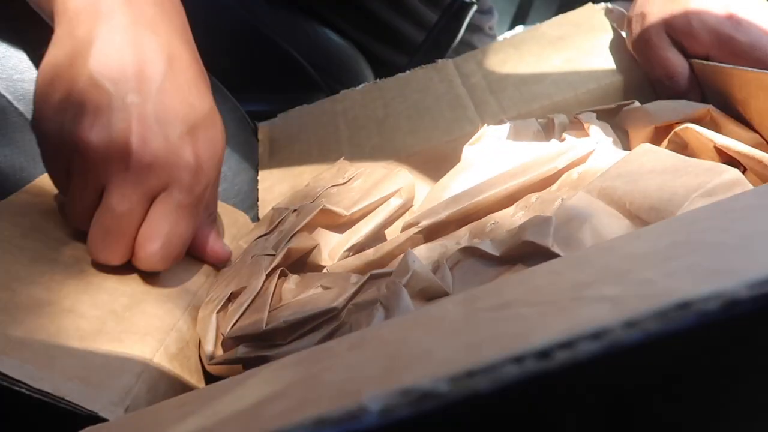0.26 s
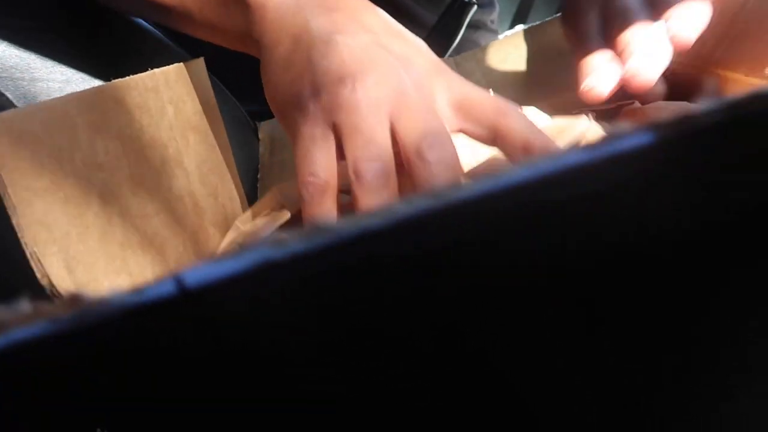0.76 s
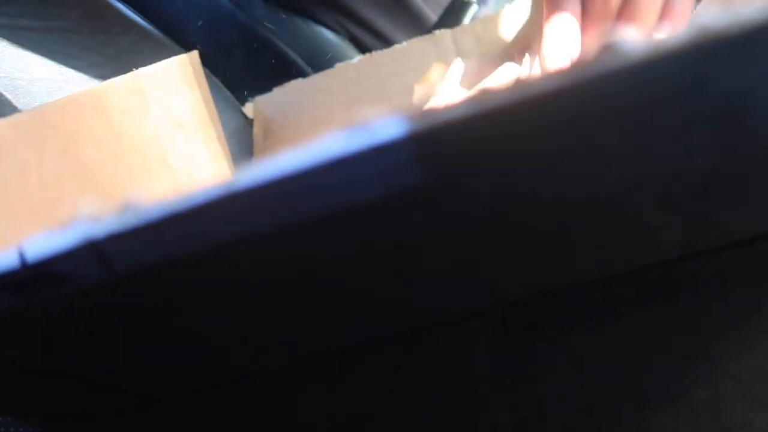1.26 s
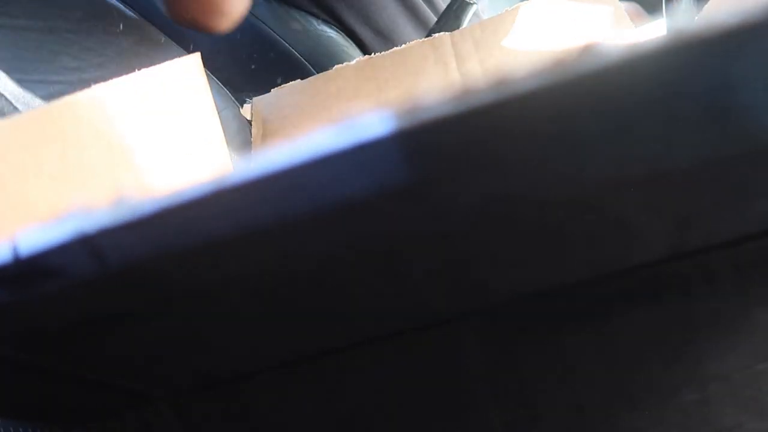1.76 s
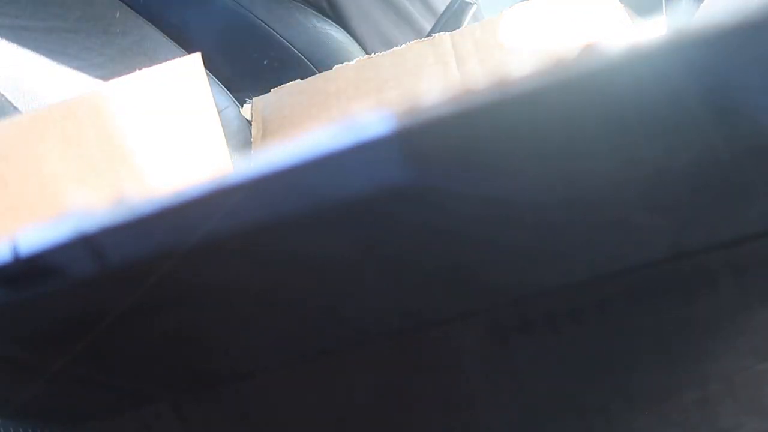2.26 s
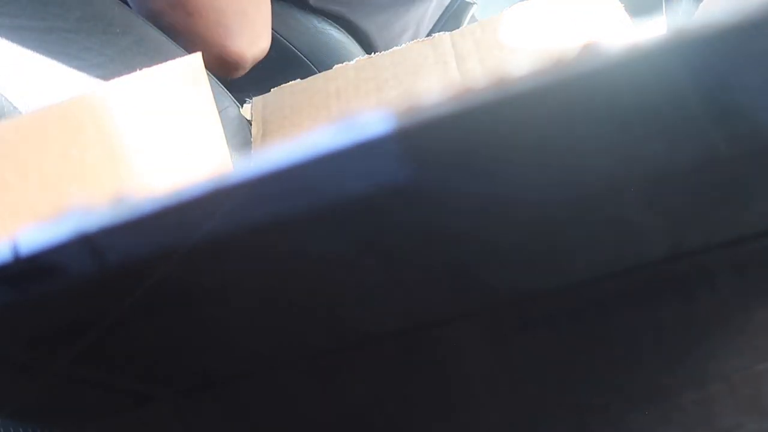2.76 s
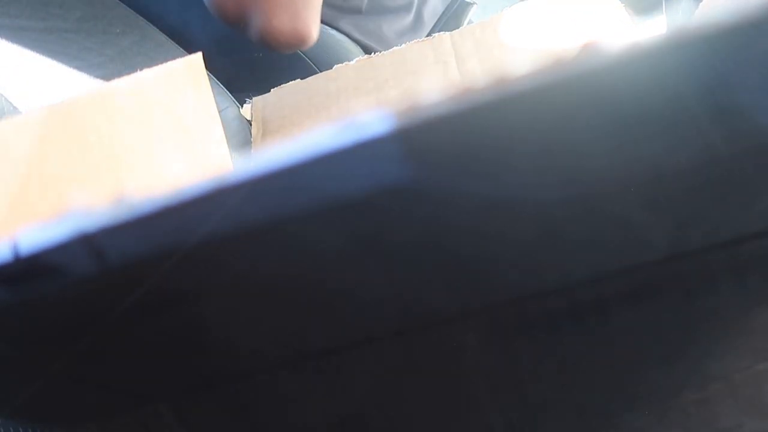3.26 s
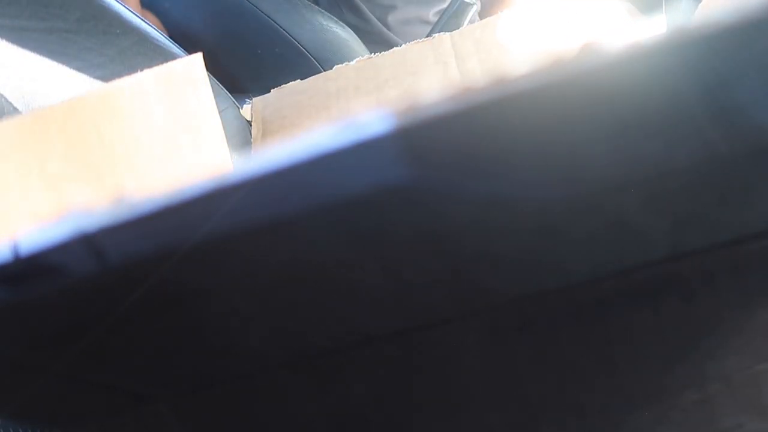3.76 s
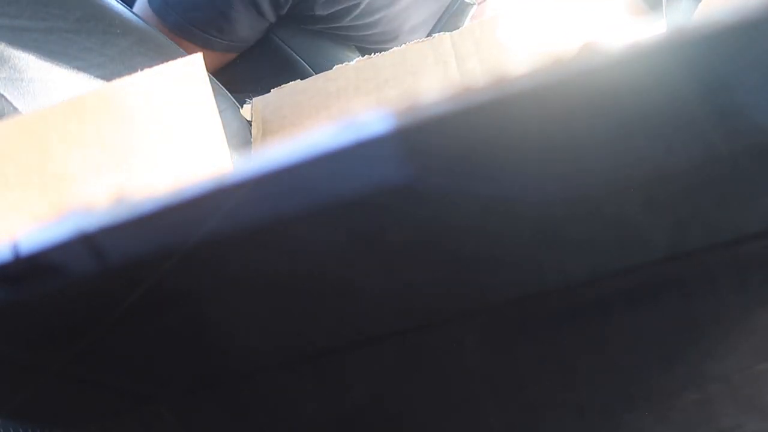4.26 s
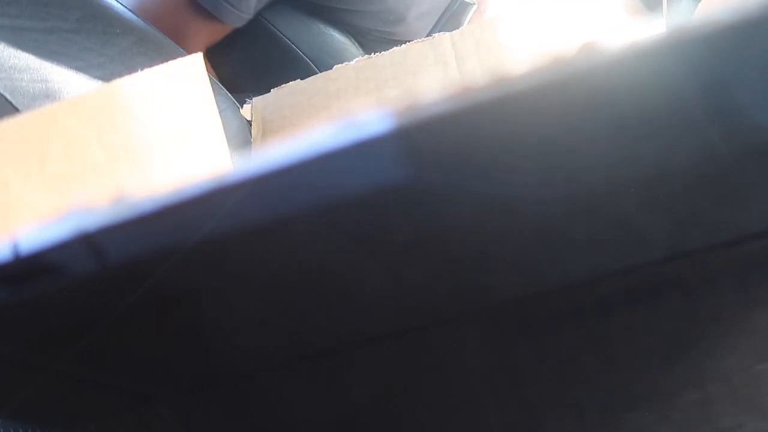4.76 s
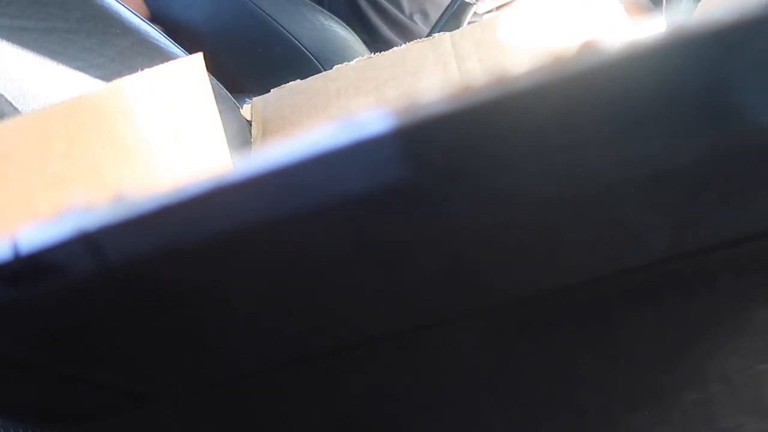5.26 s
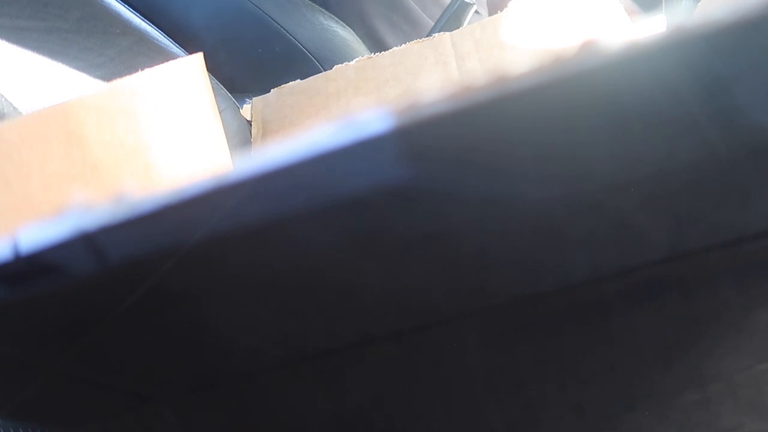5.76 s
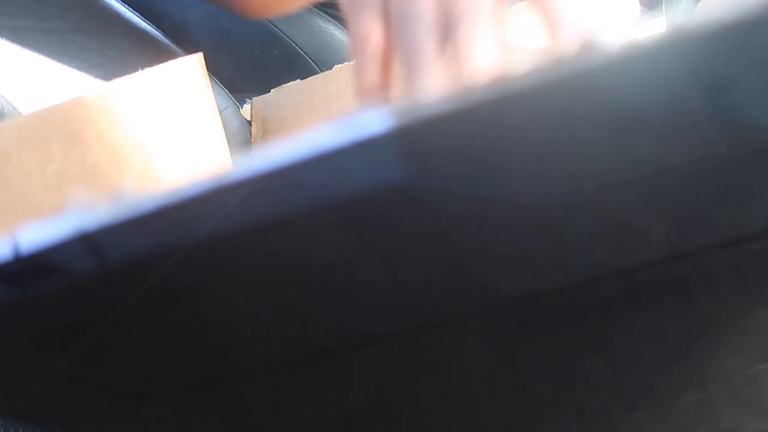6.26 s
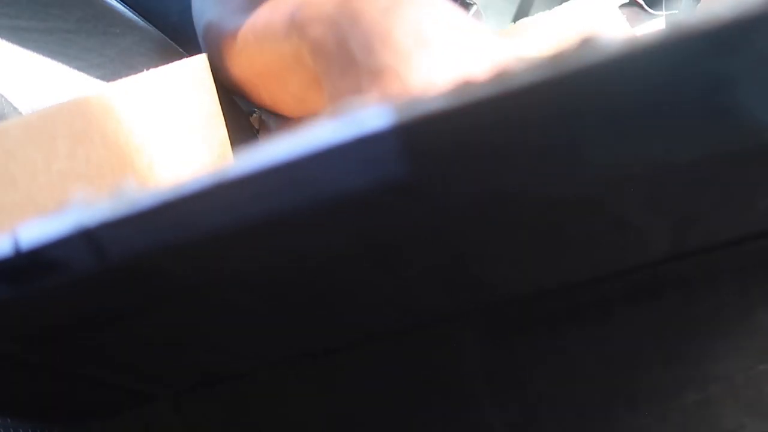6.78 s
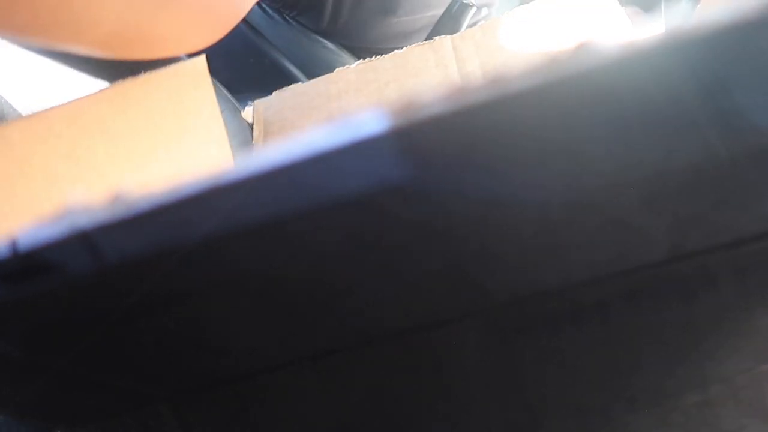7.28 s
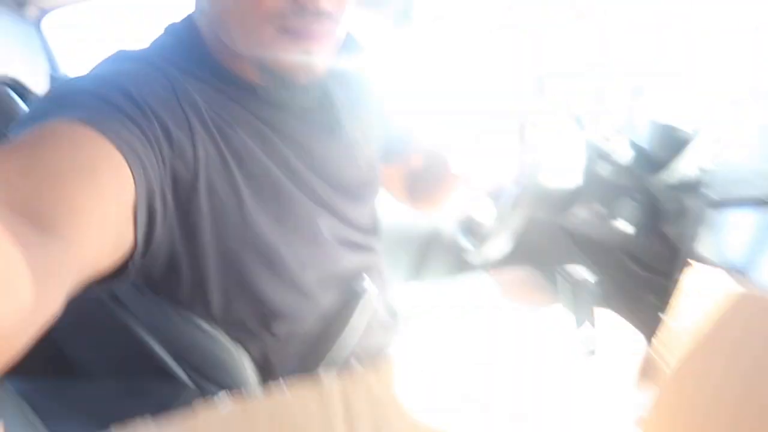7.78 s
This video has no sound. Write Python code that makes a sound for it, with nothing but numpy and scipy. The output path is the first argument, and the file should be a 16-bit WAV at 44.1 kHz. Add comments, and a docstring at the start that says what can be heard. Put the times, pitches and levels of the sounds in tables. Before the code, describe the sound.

Stiff brown paper is pulled and squeezed in a box on a car seat. Creases pop in clumps, folds give way in short crackling bursts, and cardboard flaps scrape dully, with brief faint squeaks and hollow knocks. A deep soft thump comes halfway. Activity is heaviest early and again past the middle, then fades to scattered crinkles. Very close microphones, wide stereo, almost no echo.

```python
"""Crumpled packing paper crackles and snaps as hands dig through it in a cardboard box inside a car.
Creases buckle in short pops that clump under each pull and burst as folds give way. Flaps rub in
dull slips, squeak by stick-slip and knock as damped rings; filtered noise makes the thuds of box
and seat, the car body's rumble and the quiet air. Sparse random taps give the small padded cabin
a short tail; two close microphone ports hear it in stereo."""
import sys
import numpy as np
from scipy import signal
from scipy.io import wavfile
from scipy.ndimage import uniform_filter1d

SR = 44100
rng = np.random.default_rng(int(sys.argv[2]) if len(sys.argv) > 2 else 0)


def dump(signal):
    """Clip the signal to [-1, 1] and save it as 16-bit WAV at the path in sys.argv[1]."""
    limited = np.clip(np.atleast_2d(signal).T, -1, 1)
    pcm = np.round(limited * 32767).astype(np.int16)
    wavfile.write(sys.argv[1], SR, pcm)


N = 353946  # samples

# Slack hands still stir the box: (time [s], paper level [dB], crispness [dB], rub level [dB], thud level [dB])
SLACK_HANDS = [(0.0, -31, -15.5, -32.5, -29), (0.25, -42.5, -4, -44.5, -38), (0.6, -47, -12, -41, -35),
               (1.12, -47.5, -5, -50, -49), (1.61, -71, -37, -54, -48), (1.8, -36.5, 3, -40, -44),
               (2.24, -48, -15, -45.5, -45), (2.68, -52, -14, -56, -33), (2.8, -35.5, -16, -40, -41),
               (3.64, -46.5, -3.5, -46.5, -40.5), (4.09, -59, -6, -44, -33), (4.6, -35.5, -4.5, -53, -45),
               (4.95, -40.5, -8, -35.5, -38), (5.55, -59, -22, -58, -50), (5.68, -40.5, -10, -56, -53),
               (5.76, -40, 1, -64, -54), (5.85, -63, -19, -52, -32.5), (5.89, -60, -8, -70, -42.5),
               (5.975, -70, 2, -75, -42), (6.06, -52, -9, -58, -51), (6.15, -43.5, -14, -40.5, -45),
               (6.41, -53, -10, -63, -63), (6.6, -45, 0, -41, -47), (7.06, -57, -2, -55.5, -48),
               (7.55, -45.5, -2, -38, -41), (7.82, -61, -4, -66, -46), (8.03, -51, 1, -44, -50)]
# A pull tightens, then lets go: (peak time [s], build-up [s], release [s], paper level [dB],
# crispness [dB], rub level [dB], thud level [dB])
PULLS = [(0.27, 0.051, 0.15, -37.5, -11, -33.5, -29), (0.495, 0.2, 0.044, -29.5, -2, -25, -28.5),
         (0.67, 0.057, 0.19, -21, -12, -26.5, -17), (0.78, 0.033, 0.16, -28, -26, -26.5, -40),
         (0.865, 0.11, 0.014, -21.5, 1, -20, -23.5), (0.98, 0.26, 0.21, -30, -2, -31.5, -48),
         (1.36, 0.23, 0.42, -25, -8.5, -34.5, -39), (1.5, 0.84, 0.13, -42, 11.5, -33.5, -29.5),
         (1.65, 0.021, 0.15, -27, -2, -34, -34.5), (2.002, 0.33, 0.17, -28.5, -0.5, -35, -48),
         (2.17, 0.075, 0.17, -33.5, -9, -58, -44), (2.33, 0.088, 0.051, -28, 1.5, -31, -28),
         (2.479, 0.28, 0.068, -25.5, -6, -29, -34), (2.61, 0.14, 0.14, -27, -14.5, -31.5, -33),
         (2.73, 0.042, 0.054, -31, -8, -30, -44), (3.02, 0.41, 0.27, -31.5, -9, -44, -35),
         (3.151, 0.085, 0.037, -17.5, -14, -28, -24.5), (3.26, 0.11, 0.29, -26, -4.5, -38, -37),
         (3.53, 0.22, 0.13, -33.5, -3, -28, -28), (3.89, 0.31, 0.13, -49, -7, -38, -24.5),
         (3.96, 0.21, 0.31, -39, -3, -51, -25.5), (4.197, 0.082, 0.35, -26, -8.5, -37, -32),
         (4.491, 0.13, 0.18, -36.5, -2.5, -29.5, -30), (4.831, 0.14, 0.079, -24, -5, -47, -31),
         (5.08, 0.15, 0.14, -20.5, 0.5, -48, -29), (5.3, 0.16, 0.64, -25.5, -0.5, -50, -33),
         (5.45, 0.73, 0.14, -20.5, -8.5, -55, -58), (5.6, 0.05, 0.055, -29, -12, -44, -56),
         (5.627, 0.055, 0.045, -22, -2.5, -41, -42), (5.791, 0.033, 0.09, -27, -12, -30.5, -36),
         (6.0, 0.011, 0.25, -31.5, -10, -39, -39), (6.319, 0.051, 0.12, -37, -6, -44, -42.5),
         (6.468, 0.023, 0.23, -40, 0, -23, -23), (6.93, 0.63, 0.084, -41, -5.5, -32.5, -32.5),
         (7.43, 0.2, 0.073, -55, 9, -34, -34.5), (7.691, 0.22, 0.11, -35.5, -16, -30, -28)]
# A fold gives way in a burst of crackle: (time [s], level [dB], t60 [s], crispness [dB])
CRUMPLES = [(0.2503, -27, 0.031, -1), (0.4199, -7.5, 0.056, -23), (0.4614, -20, .07, -10),
            (0.4703, -5, 0.16, -15), (0.619, -22, 0.4, -16), (0.639, -10, 0.068, -6),
            (0.654, -14, 0.037, -6), (0.675, -15, .04, -13), (0.725, -1, 0.086, -16),
            (0.7956, -6, 0.13, -22), (0.832, -19, 0.062, -8), (0.8624, 1.5, 0.022, 4.5),
            (0.9033, -3.5, 0.065, -3), (0.919, -4, 0.071, -23), (0.9727, -7, 0.1, -13),
            (1.003, 3, 0.062, -21), (1.0597, -10.5, 0.074, -12), (1.121, -17.5, 0.067, -29),
            (1.181, -13.5, 0.077, -27), (1.2306, -12, 0.028, -5), (1.2595, -12, 0.055, -19),
            (1.3618, -17, .082, -9), (1.4905, -3, 0.038, -10), (1.6337, -17, 0.053, 12),
            (1.6625, -15, 0.16, -1), (1.757, -16.5, 0.12, -5), (1.9812, 3.5, 0.032, -1.5),
            (2.153, -2, 0.025, -5), (2.272, -9.5, 0.11, -2), (2.316, 2.5, 0.062, -9),
            (2.336, -4, 0.06, 0.5), (2.387, -10.5, 0.11, 7), (2.459, -5, 0.09, -15), (2.562, -6, 0.038, -5),
            (2.715, -2.5, 0.063, -14.5), (2.914, -12.5, 0.071, -8), (2.93, 6, 0.041, -16),
            (2.9846, -13.5, 0.25, -2.5), (3.0483, -10, 0.47, -17), (3.1198, -5, 0.09, -14),
            (3.206, -14.5, 0.086, 2), (3.345, -8.5, 0.16, 1.5), (3.4262, -5, 0.042, 5),
            (3.4787, -4, 0.096, -7), (3.5094, -7, 0.22, -11), (3.592, -4.5, 0.071, -18),
            (3.697, -20, 0.12, -24), (3.949, 2.5, 0.031, -1.5), (4.115, -14.5, 0.15, 0),
            (4.497, -23.5, 0.31, 2.5), (4.6828, 5, 0.011, 19.5), (4.7466, -21, 0.089, 2),
            (4.8035, -7, 0.041, 4), (4.837, -5.5, 0.063, 2), (4.964, -9.5, 0.063, -13),
            (5.031, -3.5, 0.081, 2.5), (5.074, -14, 0.16, 0.5), (5.1233, -3, 0.16, -25),
            (5.194, -4, 0.024, 11), (5.209, -11, 0.033, 1), (5.2579, -8.5, 0.29, -23),
            (5.293, -3, 0.095, -12), (5.459, 0, 0.056, -23), (5.556, -8.5, 0.13, -10),
            (5.613, -6, 0.05, 8.5), (5.7848, -7, 0.065, 0.5), (5.864, -7, 0.057, -11),
            (5.985, -18.5, 0.11, -4.5), (5.9982, 0.5, 0.044, -4.5), (6.0705, -15, 0.1, -15),
            (6.319, -11, 0.042, -7), (6.4556, -15, 0.13, 0.5), (6.494, 0.5, 0.038, -21),
            (6.877, -10.5, 0.061, -5.5), (6.9162, -18.5, 0.22, -13), (7.361, -23, 0.064, 6),
            (7.563, -13, 0.019, 4.5), (7.7189, -11, 0.011, 15.5)]
# Single creases that snap: (time [s], level [dB], pitch [Hz])
SNAPS = [(0.2501, -5, 1930), (0.4711, 0.5, 2820), (0.6564, 0, 3500), (0.677, -4, 3000), (0.726, 2, 3000),
         (0.7302, 0, 1590), (0.797, -4, 2970), (0.829, 1.5, 3470), (0.8326, 2, 2930), (0.8431, 4, 2860),
         (0.853, -8, 1970), (0.863, 0.5, 1840), (0.904, -7, 2420), (0.9212, 0.5, 3040), (0.974, -4.5, 2700),
         (1.005, 4, 3870), (1.013, -3, 3630), (1.2316, -17.0, 2580), (1.2599, -4, 4230), (1.32, -15, 2390),
         (1.439, -7, 2370), (1.492, 0.5, 3300), (1.4974, -9.5, 1410), (1.983, -20, 3400),
         (2.156, -11, 3130), (2.2775, -7.5, 2020), (2.341, -1, 3120), (2.3914, -13, 1980),
         (2.7172, -9, 1340), (2.9359, -17, 2620), (2.9377, -16, 1730), (3.142, -8, 2450), (3.431, -4, 2750),
         (3.599, -17, 2350), (3.952, -11.5, 1720), (4.201, -11.5, 1700), (4.4979, -10.5, 1970),
         (4.5147, -6, 4400), (4.684, -3, 2940), (4.805, -3, 2530), (4.808, -1.5, 3930), (4.8373, 4, 4630),
         (4.84, -1.5, 2800), (4.849, -6, 2780), (5.036, 0, 2220), (5.0387, -6, 2670), (5.0743, 1, 2610),
         (5.1241, 2.5, 2460), (5.2104, -2, 1880), (5.259, -13, 2220), (5.293, 2.5, 2000), (5.333, -7, 1920),
         (5.37, -3.5, 1250), (5.56, -11, 1820), (5.616, -13, 2380), (5.7902, -9.5, 1040),
         (5.866, -22, 2130), (6.002, -11, 1740), (6.4577, -3, 2760), (7.3642, -17, 2400), (7.565, -8, 2180),
         (7.7213, -10.5, 1920), (7.7215, -11, 4200)]
# Colour of the paper: (frequency [Hz], level per hertz [dB])
PAPER_COLOUR = [(200, -22), (400, -9), (800, -3.5), (1400, 2), (2600, 2), (4500, -4.5), (7000, -11),
                (11000, -26.5), (16000, -49)]
# Knocks on the box: (time [s], level [dB], frequency around which this spot rings [Hz])
KNOCKS = [(0.249, -12, 920), (0.252, -15, 315), (0.277, -10.5, 96), (0.677, -4.5, 140), (0.699, -41, 143),
          (0.726, -4.5, 150), (0.906, -14.5, 840), (1.493, -7.5, 232), (1.513, -21, 96), (1.644, -21, 715),
          (2.028, -13.5, 137), (2.314, -16.5, 1140), (2.561, -18.5, 613), (2.712, -17, 138),
          (3.779, -16.5, 420), (3.781, -21, 140), (3.829, -28, 700), (3.862, -12.5, 144), (3.876, -16, 140),
          (3.889, -15, 144), (3.903, -22, 144), (3.957, -2, 52), (3.951, -15, 372), (3.953, -23, 950),
          (4.012, -26, 75), (4.044, -26, 422), (4.12, -25.5, 680), (4.122, -24, 88), (4.198, -12.5, 870),
          (4.802, -19.5, 1090), (5.03, -25, 1090), (5.785, -17, 674), (6.144, -25, 138), (6.455, -9.5, 410),
          (6.494, -12, 810), (6.529, -23, 550), (6.684, -17.5, 384), (6.841, -14.5, 550), (6.922, -23, 590),
          (7.022, -27, 760), (7.363, -26, 540), (7.429, -21, 380), (7.433, -20, 200), (7.517, -21.5, 300),
          (7.534, -25, 685), (7.702, -28, 1090), (7.7216, -14.5, 690), (7.727, -28, 150)]
# Modes of the box, from its bottom on the seat to its flaps: (frequency [Hz], t60 [s])
WALL_MODES = [(52, 0.067), (95, 0.14), (143, 0.051), (235, 0.03), (320, 0.049), (420, 0.043), (550, 0.035),
              (720, 0.024), (880, 0.04), (1090, 0.061)]
# Colour of the cardboard rub: (frequency [Hz], level per hertz [dB])
CARD_COLOUR = [(88, -54.5), (150, -16.5), (404, -2), (446, -4.5), (566, -4), (1380, -15.5), (2110, -23),
               (2520, -11), (3000, -21), (3900, -63), (6600, -120)]
# Colour of the thuds of box and seat: (frequency [Hz], level per hertz [dB])
SEAT_COLOUR = [(32, -22.5), (55, -3.5), (140, -3), (300, -10.5), (390, -29.5), (660, -120)]
# The car body rocks: (time [s], rumble level [dB])
ROCKING = [(0.0, -53), (0.5, -57), (1.81, -71), (2.39, -36), (2.59, -45), (3.73, -42), (3.96, -28),
           (4.38, -41.5), (5.43, -50), (5.56, -65), (6.26, -67), (6.44, -44), (6.97, -68), (7.6, -47),
           (8.03, -55)]
# Colour of the quiet cabin air: (frequency [Hz], level per hertz [dB])
AIR_COLOUR = [(18, -24), (30, -6), (145, -4), (300, -13.5), (500, -2), (3500, -23.5), (8000, -35),
              (12000, -45), (15600, -68)]
# Surfaces squeak as they slide: (start [s], end [s], level [dB], first pitch [Hz], last pitch [Hz],
# resonator width [Hz])
SQUEAKS = [(1.342, 1.41, -24, 1515, 1730, 150), (1.362, 1.45, -17.5, 2066, 2320, 190),
           (1.42, 1.482, -21.5, 2320, 2130, 190), (1.416, 1.446, -21, 2800, 2690, 200),
           (2.687, 2.724, -36, 3470, 3520, 200), (3.337, 3.398, -19.5, 3310, 3620, 298),
           (6.143, 6.286, -43, 3020, 3370, 250), (6.154, 6.277, -44, 2470, 2204, 300),
           (6.291, 6.343, -37, 4040, 3810, 300), (6.318, 6.417, -38.5, 3440, 2780, 248),
           (6.846, 7.005, -27.5, 593.5, 517, 111), (6.85, 6.897, -36, 1013, 1087, 150),
           (6.856, 6.972, -36.5, 1620, 1570, 200), (1.358, 1.436, -26, 3420, 3640, 300),
           (1.435, 1.473, -31, 3930, 3880, 250), (6.892, 7.004, -35.5, 3620, 2760, 300),
           (6.912, 6.955, -30.5, 2450, 2510, 250), (7.603, 7.722, -36.5, 4260, 2480, 250),
           (5.4, 5.49, -33, 825, 659, 150), (7.415, 7.469, -29, 453, 294, 70),
           (7.412, 7.461, -27, 204, 176, 40)]
# Air modes of the open box and the dip above them: (frequency [Hz], width [Hz], lift [dB])
BOX_AIR = [(749, 170, 5.5), (1050, 76, 3), (1333, 230, -5)]
# Decay of the padded cabin: (frequency [Hz], t60 [s])
CABIN_DECAY = [(100, 0.11), (1000, 0.031), (10000, 0.046)]
# How far the paper lies to the side of the port pair: (time [s], level of the port difference [dB])
ASIDE = [(0, -2.5), (.6, -5.5), (1.1, -3), (1.5, -1.5), (2.1, -4.5), (2.4, 2.5), (3, 4.5), (3.4, 1.5),
         (3.8, -3.5), (4.4, 0), (5, 0), (5.5, 1.5), (5.8, -0.5), (6.3, 1), (6.5, -3.5), (7, -5), (7.5, 4),
         (8.03, -7)]
# Colour of the common sound: the deepest bass rolls off and the treble thins out: (frequency [Hz], gain [dB])
SUM_COLOUR = [(18, -12), (40, -1.5), (3000, -2.5), (6000, -10), (8500, -15), (10500, -23.5), (15500, -19.5)]
# Difference of the ports: (frequency [Hz], gain [dB])
DIFFERENCE_COLOUR = [(60, -43), (160, -34), (300, -20), (740, -17), (1200, -6), (2000, -15), (3300, -4.5),
                     (5500, -2), (9000, 1.5), (15500, 12.5)]

SLACK_DB = -34.5  # change from the peak of a pull to one build-up before it or one release after it
HOLD = 1.475  # over 1, a pull stays near its peak and lets go the faster
CREST_DB, CRUMPLE_RISE_S = 9.5, 0.0058  # taken off the level of a burst; time constant of its onset
TICKS_PER_S, TICKS_DB = 320., -5  # small creases; level relative to the crackle
HARD_HZ = 690  # spots that ring lower are softer and give less click and grit
SPOT_OCTAVES = 0.16  # how far from its centre a knock reaches other modes
STEADY = 0.45  # share of a squeak that slips at an even rate
AIR_DB, EDGE_HZ = -52, 15700  # air level ahead of the ports; upper band limit


def gain_of(db):
    """dB to gain."""
    return 10 ** (np.asarray(db) / 20)


def evened(x):
    """Scales to rms 1."""
    return x / np.sqrt(np.mean(x ** 2) + 1e-20)


def read(points, hz):
    """Straight lines on a log-frequency axis."""
    f, value = np.transpose(points)
    return np.interp(np.log(hz + 1), np.log(f + 1), value)


def curve(rows, axis):
    """One column of a time curve at every sample."""
    rows = np.array(rows)
    return np.interp(np.arange(N) / SR, rows[:, 0], rows[:, axis])


def add(mix, s, sound):
    """Mixes a sound in at s seconds."""
    part = mix[round(s * SR):][:len(sound)]
    part += sound[:len(part)]


def colour(x, points):
    """Causal minimum-phase filter with the given spectrum."""
    size = 8192
    gain_db = np.maximum(read(points, abs(np.fft.fftfreq(size, 1 / SR))), -100)
    log_gain = gain_db * np.log(10) / 20
    taps = np.fft.ifft(np.exp(np.conj(signal.hilbert(log_gain)))).real[:size // 2]
    return signal.oaconvolve(x, taps)[:N]


def resonate(x, hz, width):
    """Shifts the curve hz down to zero, smooths, and shifts back: a resonance of gain 1."""
    turn = np.exp(2j * np.pi * np.cumsum(hz * np.ones(len(x))) / SR)
    r = np.exp(-np.pi * width / SR)
    return 2 * (turn * signal.lfilter([1 - r], [1, -r], x / turn)).real


def clumps(rate_hz, depth_db):
    """Slipping comes in fits: a wandering gain of rms 1."""
    slow = signal.lfilter([1], [1, -np.exp(-2 * np.pi * rate_hz / SR)], rng.standard_normal(N))
    return evened(gain_of(depth_db * evened(uniform_filter1d(slow, 60))))


def hand(layer):
    """Power of a layer under the slack hands and every pull; layer maps the four levels to one dB."""
    slack_levels = [curve(SLACK_HANDS, axis=k) for k in range(1, 5)]
    power = gain_of(2 * layer(*slack_levels))  # doubled dB gives power
    for s, build, release, *levels in PULLS:
        start = max(s - 2 * build, 0)
        t = np.arange(start - s, 2 * release, 1 / SR)
        away = np.maximum(-t / build, t / release) ** HOLD
        add(power, start, gain_of(2 * (layer(*levels) + SLACK_DB * away)))
    return power


def pop(hz, cycles):
    """A patch of sheet flips and wobbles for a few cycles; peak near 1."""
    u = np.arange(int(5 * cycles * SR / hz) + 2) * hz / SR / cycles
    envelope = np.e * 2 * u * np.exp(-2 * u)
    return envelope * np.sin(2 * np.pi * cycles * u)


def grains(lo_hz, hi_hz, per_s, cycles, spread_db, count):
    """Sparse pops at many pitches, a few of them large; flat spectrum, one row a pitch."""
    pitches = np.geomspace(lo_hz, hi_hz, count)
    rows = []
    for hz in pitches:
        hit = rng.random(N) < per_s * np.sqrt(hz / lo_hz) / SR  # small patches flip more often
        hits = hit.sum()
        sizes = gain_of(spread_db * np.minimum(rng.exponential(1, hits), 5))
        train = np.zeros(N)
        train[hit] = sizes * rng.choice([-1, 1], hits)
        rows.append(np.sqrt(hz) * evened(signal.oaconvolve(train, pop(hz, cycles))[:N]))
    return pitches, np.array(rows)


def patches(count, length_s, depth_db):
    """Other parts of the sheet take over from moment to moment: a wandering gain for each pitch."""
    step = 128  # samples between gain points
    field = rng.standard_normal((N // step + 2, count)).T
    field = uniform_filter1d(field, max(round(length_s * SR / step), 1), axis=1)
    field = uniform_filter1d(field, size=5, axis=0)  # neighbouring pitches move together
    gains = evened(gain_of(depth_db * evened(field)))
    return np.array([np.interp(np.arange(N) / step, np.arange(len(row)), row) for row in gains])


def crease_ticks():
    """Small creases crack as single impulses, sharp across all pitches, in the colour of paper."""
    sizes = gain_of(3.0 * np.minimum(rng.exponential(1, N), 4))
    ticks = (rng.random(N) < TICKS_PER_S / SR) * sizes * rng.choice([-1, 1], N)
    return gain_of(TICKS_DB) * evened(colour(ticks, PAPER_COLOUR))


def crease_snaps():
    """Single creases snap as one loud pop, with a shorter, higher pop as the sharp edge of the crack."""
    snaps = np.zeros(N)
    for s, db, hz in SNAPS:
        add(snaps, s, gain_of(db) * pop(hz, cycles=1.47))
        add(snaps, s, gain_of(db - 6.0) * pop(4.8 * hz, cycles=0.29))
    return snaps


def paper():
    """Buckling creases crackle in shifting colour under the hands, burst as folds give way, and snap."""
    power = hand(lambda paper_db, *_: paper_db)
    crisp = hand(lambda paper_db, crisp_db, *_: paper_db + crisp_db)
    t = np.arange(SR // 4) / SR
    for s, db, t60, crisp_db in CRUMPLES:
        fade_db = db - CREST_DB - 60 * t / max(t60, .01)
        burst = gain_of(2 * fade_db) * (1 - np.exp(-t / CRUMPLE_RISE_S)) ** 2
        add(power, s, burst)
        add(crisp, s, burst * gain_of(2 * crisp_db))
    pitches, rows = grains(300, 15500, per_s=80., cycles=3.34, spread_db=1.5, count=36)
    rows = rows * patches(len(rows), length_s=.025, depth_db=3.0)
    share = 1 / (1 + (4800 / pitches) ** 4)  # fine creases carry the treble
    body = colour((1 - share) @ rows, PAPER_COLOUR)
    fine = colour(share @ rows, PAPER_COLOUR)
    crackle = (body * np.sqrt(power) + fine * np.sqrt(crisp) * gain_of(14.0)) / np.std(body)
    crackle = crackle + crease_ticks() * np.sqrt(power)
    fits = clumps(rate_hz=11.0, depth_db=1.0) * clumps(rate_hz=43.0, depth_db=0.3)
    return crackle * fits + crease_snaps()


def cardboard():
    """Flaps rub in dull uneven slips and get knocked: a damped ring with a click and a puff of grit."""
    rows = grains(150, 3000, per_s=180., cycles=1.98, spread_db=2.0, count=16)[1]
    slips = evened(colour(rows.sum(0), CARD_COLOUR))
    rub = np.sqrt(hand(lambda paper_db, crisp_db, rub_db, thud_db: rub_db))
    out = slips * rub * gain_of(-1.0) * clumps(rate_hz=39.0, depth_db=2.5)
    t = np.arange(SR // 8) / SR
    hz, t60 = np.transpose(WALL_MODES)
    fades = gain_of(-60 * t / t60[:, None])
    modes = fades * np.sin(2 * np.pi * hz[:, None] * t)
    click = np.exp(-t / 0.00027)
    for s, db, spot_hz in KNOCKS:
        reach = np.exp(-.5 * (np.log2(hz / spot_hz) / SPOT_OCTAVES) ** 2)
        reach = reach / reach.sum()
        grit = slips[round(s * SR):][:len(t)] * (reach @ fades)
        hardness = min(spot_hz / HARD_HZ, 1)
        add(out, s, gain_of(db) * (0.89 * (reach @ modes) + hardness * (0.53 * grit + 0.5 * click)))
    return out


def thuds():
    """The box and seat shake under the hands: lumpy bass, over a deep rumble of the car body."""
    shake = np.sqrt(hand(lambda *levels: levels[-1]))
    lumps = evened(colour(rng.standard_normal(N), SEAT_COLOUR)) * shake * clumps(rate_hz=3.3, depth_db=4.0)
    deep = resonate(resonate(rng.standard_normal(N), 46.0, 25.), 46.0, 25.)
    return lumps + evened(deep) * gain_of(curve(ROCKING, axis=1))


def cabin_air():
    """Steady noise in the colour of the quiet cabin."""
    return gain_of(AIR_DB) * evened(colour(rng.standard_normal(N), AIR_COLOUR))


def squeaks():
    """Fast stick-slip into a narrow gliding resonance, catching in fits."""
    out, fits = np.zeros(N), clumps(rate_hz=90., depth_db=1.5)
    for start, end, db, first_hz, last_hz, width in SQUEAKS:
        pitch = np.linspace(first_hz, last_hz, round((end - start) * SR))
        slips = rng.standard_normal(len(pitch))
        rough = resonate(resonate(slips, pitch, width), pitch, width)
        wander_hz = 0.32 * width * evened(uniform_filter1d(slips, 300))
        even = np.sin(2 * np.pi * np.cumsum(pitch + wander_hz) / SR)
        whistle = STEADY * evened(even) + (1 - STEADY) * evened(rough)
        whistle = evened(whistle * fits[round(start * SR):][:len(pitch)])
        add(out, start, gain_of(db) * whistle * signal.windows.tukey(len(pitch), .5))
    return out


def box_air(x):
    """Air in the open box lifts its resonances and leaves a dip above them."""
    return x + sum((gain_of(db) - 1) * resonate(x, hz, width) for hz, width, db in BOX_AIR)


def cabin(x):
    """Tails of sparse random taps; the hands keep moving, so the sound passes from one tail to the next."""
    length, turn = SR // 4, np.arange(N) / SR * 22.  # turn in radians
    out = np.zeros((2, N))
    for k in range(3):
        taps = np.zeros((2, length))
        # one tap at a random place in every 5 samples
        at = np.arange(60, length - 5, 5) + rng.integers(0, 5, (2, (length - 61) // 5))
        np.put_along_axis(taps, at, rng.choice([-1., 1.], at.shape), 1)
        hz, t, z = signal.stft(taps, SR, nperseg=128)
        fades = gain_of(-60 * t / read(CABIN_DECAY, hz)[:, None])
        tail = signal.istft(z * fades, SR, nperseg=128)[1]
        fed = x * np.sqrt(2 / 3) * np.cos(turn + k * np.pi / 3)  # the three powers add up to 1
        out += signal.oaconvolve(fed[None], tail / np.linalg.norm(tail[0]), axes=1)[:, :N]
    return out


def scene():
    """Rows: sound common to both ports, and sound that differs between them."""
    dry = box_air(paper() + cardboard() + squeaks())
    near, across = cabin(dry)
    low, aside_db = thuds(), curve(ASIDE, axis=1)
    common = dry + gain_of(-7.5) * near
    high_pass = signal.butter(4, 9000, "high", fs=SR, output="sos")
    top = signal.sosfiltfilt(high_pass, common)
    # the top of the common sound gets weaker as the paper lies further aside
    common = common + (gain_of(-2.5 * aside_db) - 1) * top
    common = common + low + cabin_air()
    apart = gain_of(-24.0) * np.roll(dry, 3) + gain_of(-5.0) * across
    apart = gain_of(aside_db) * apart + gain_of(-7.5) * np.roll(low, 40) + gain_of(7.5) * cabin_air()
    return np.array([common, apart])


def record(dry):
    """Sum and difference of the ports, each coloured, make left and right; soft peaks and a band limit."""
    common, apart = colour(dry[0], SUM_COLOUR), colour(dry[1], DIFFERENCE_COLOUR)
    pair = np.array([common + apart, common - apart])
    pair = 1.1 * np.tanh(pair / 1.1)  # the input stage rounds the peaks
    low_pass = signal.firwin(511, EDGE_HZ, window=("kaiser", 9), fs=SR)
    return signal.oaconvolve(pair, low_pass[None], "same")


dry = scene()
out = record(dry)
dump(out)
```